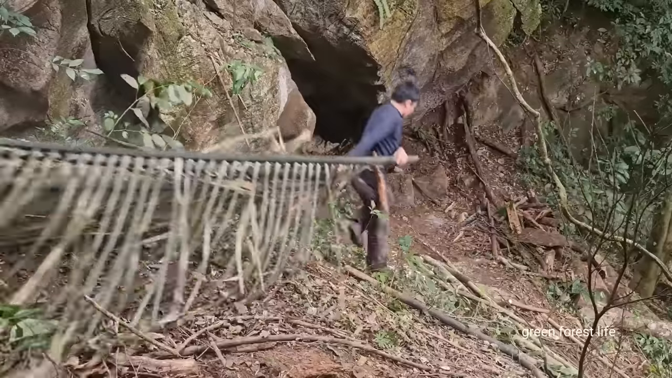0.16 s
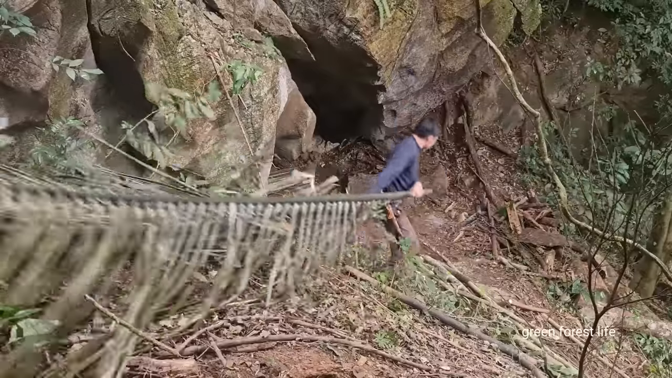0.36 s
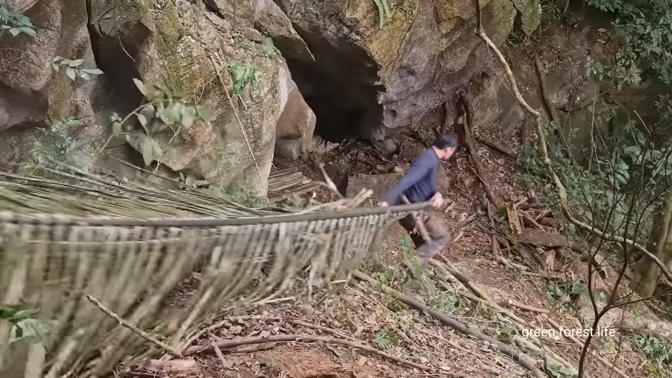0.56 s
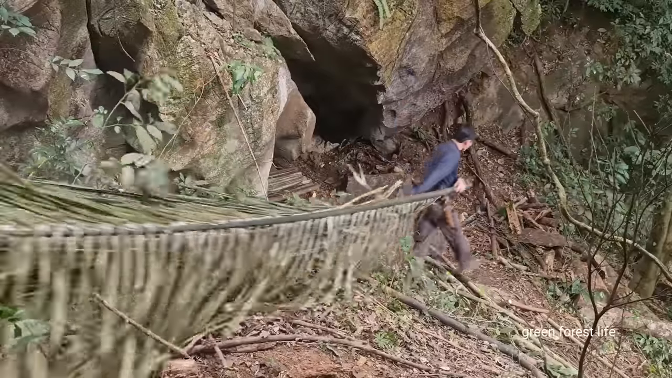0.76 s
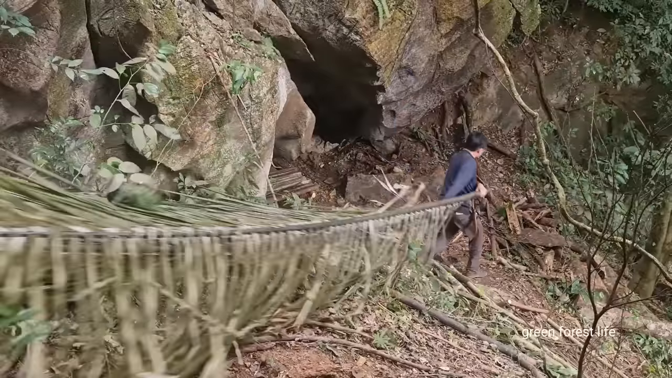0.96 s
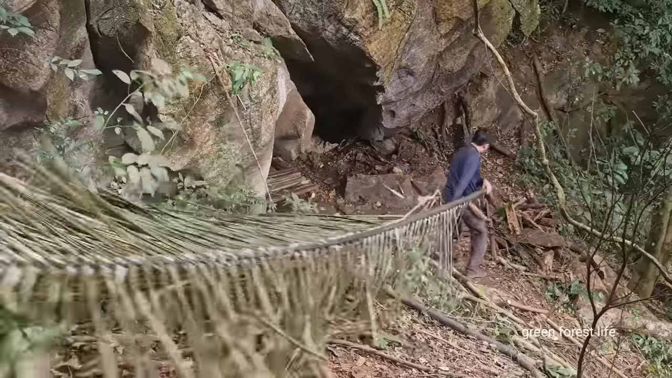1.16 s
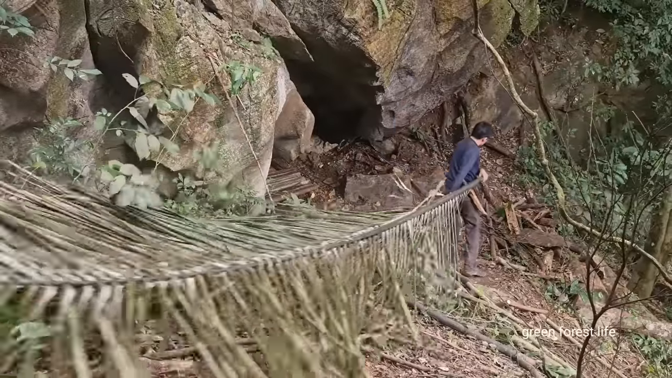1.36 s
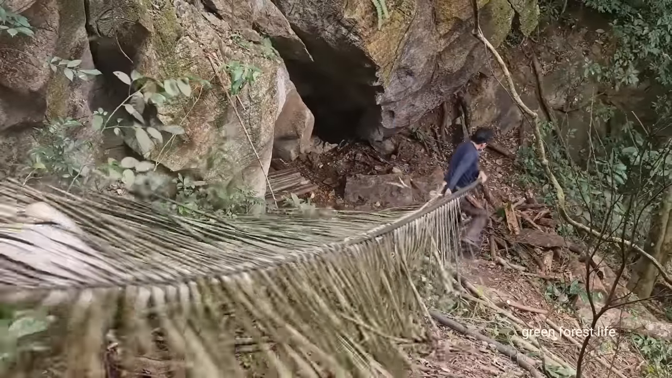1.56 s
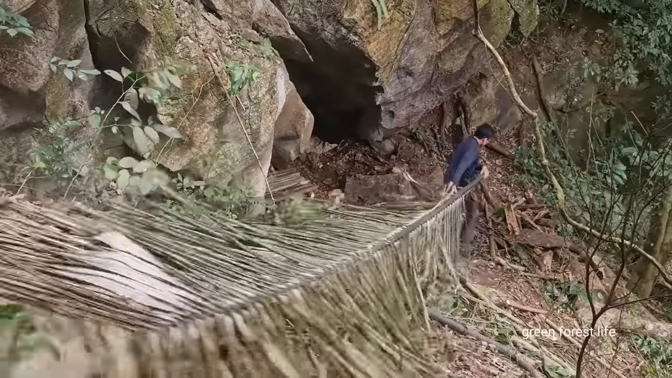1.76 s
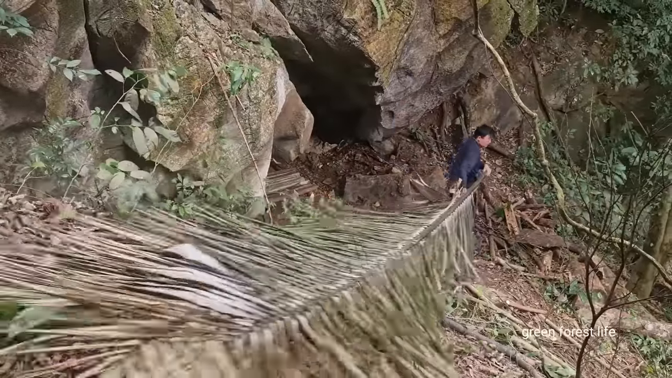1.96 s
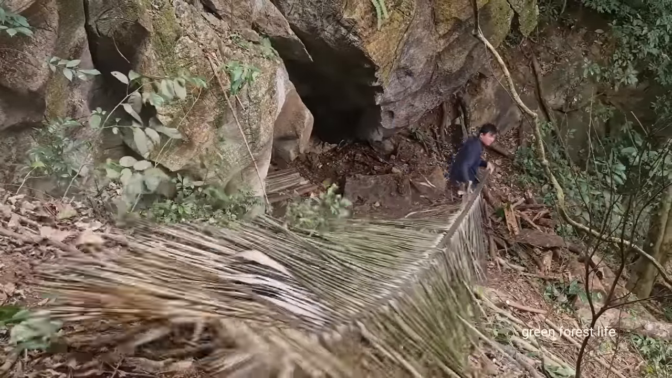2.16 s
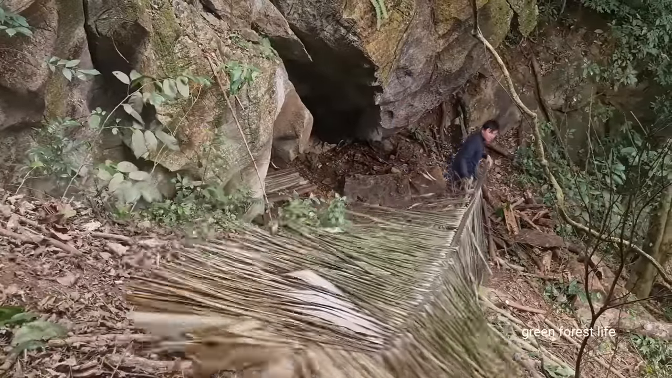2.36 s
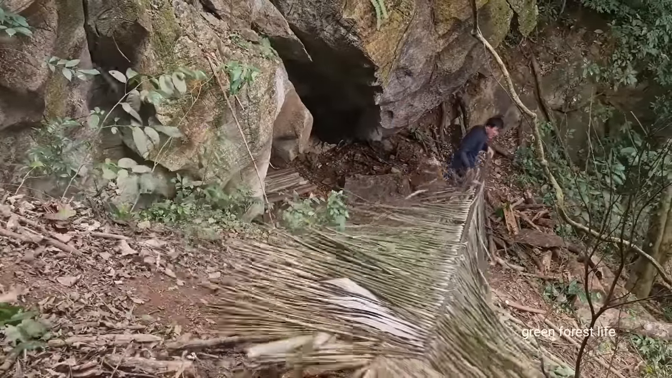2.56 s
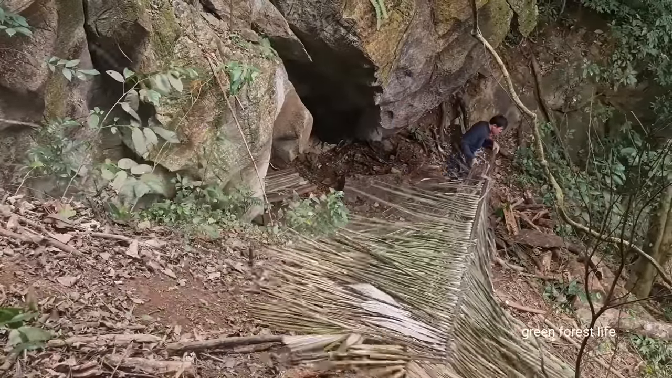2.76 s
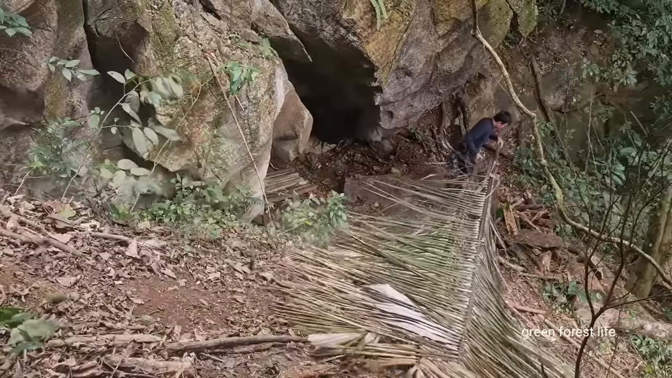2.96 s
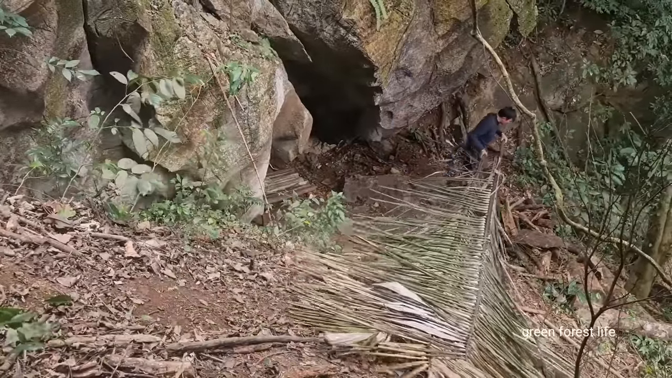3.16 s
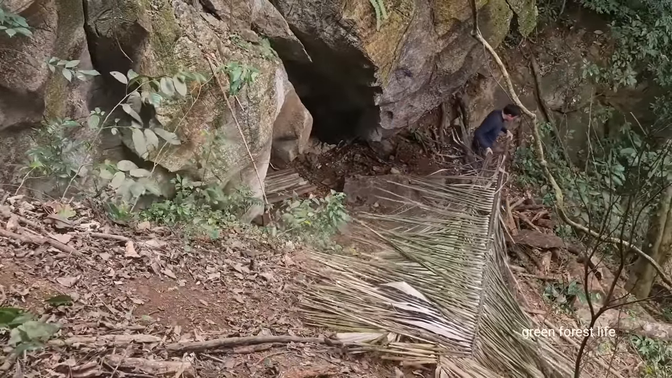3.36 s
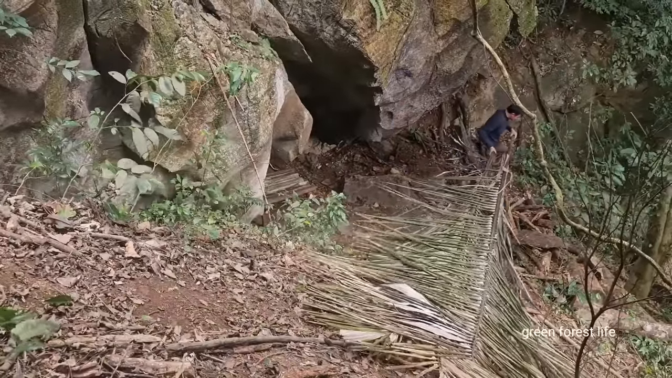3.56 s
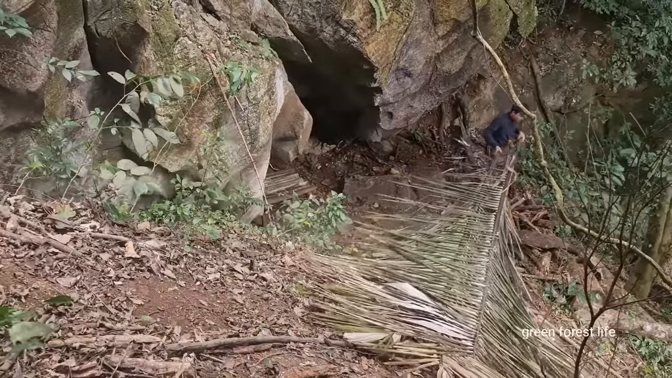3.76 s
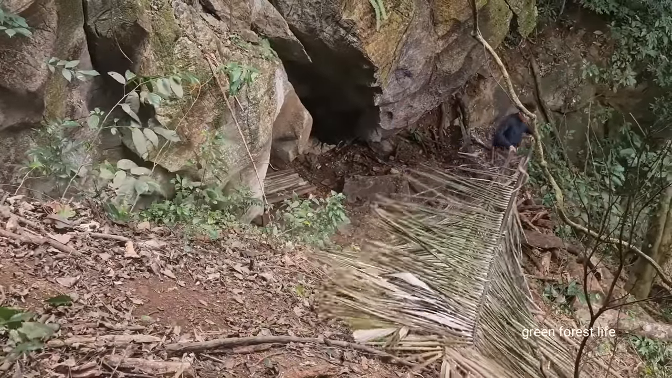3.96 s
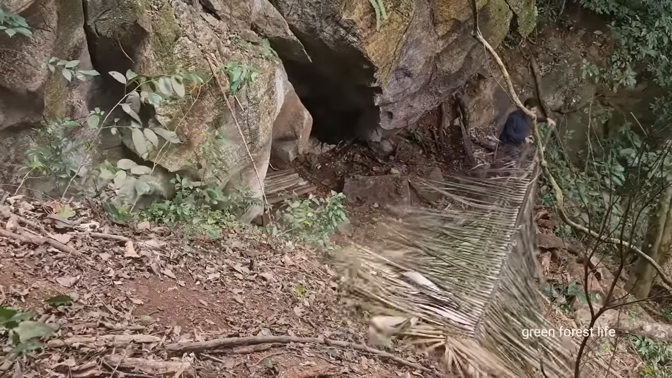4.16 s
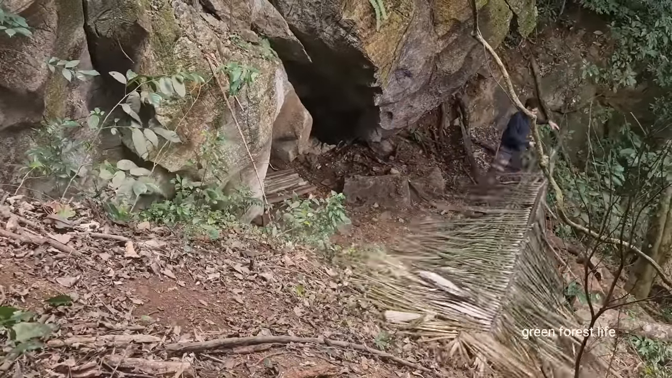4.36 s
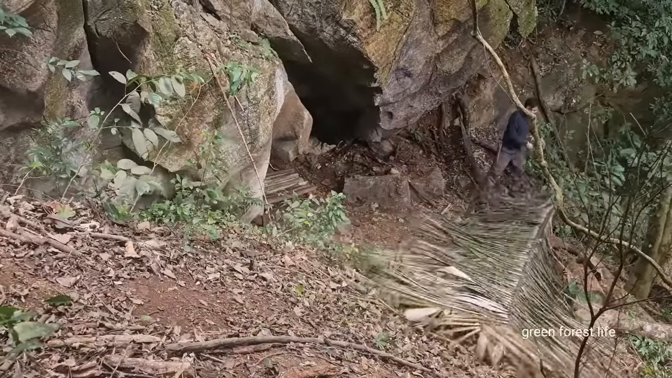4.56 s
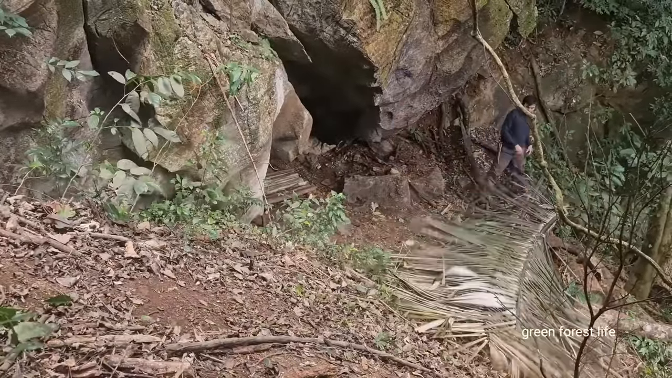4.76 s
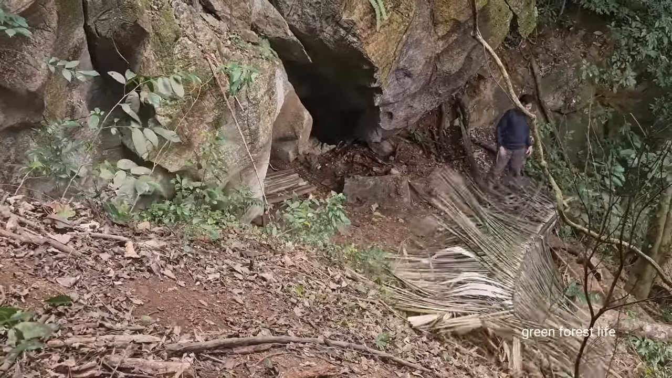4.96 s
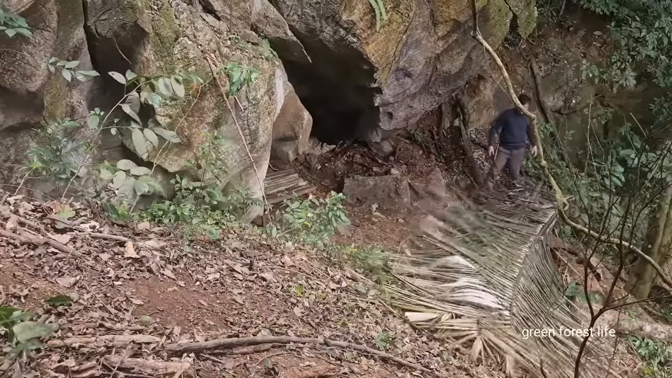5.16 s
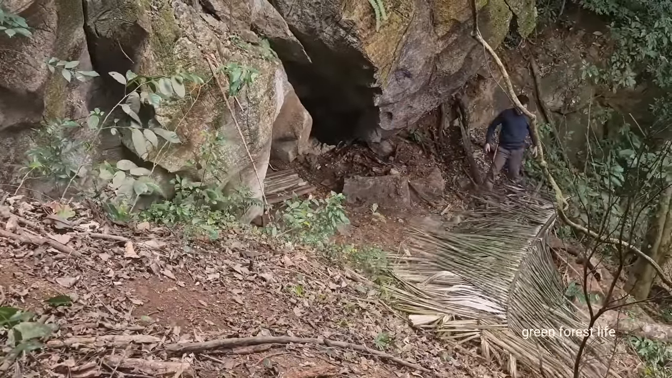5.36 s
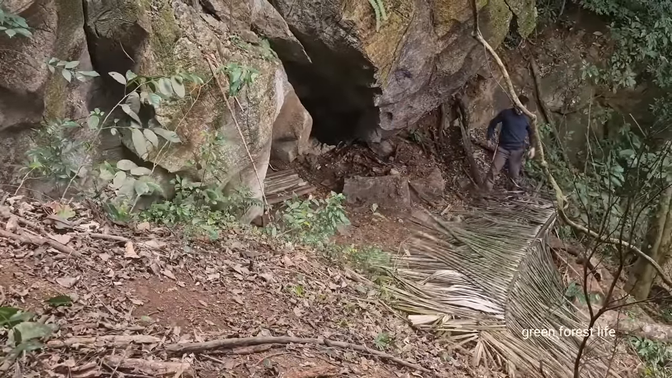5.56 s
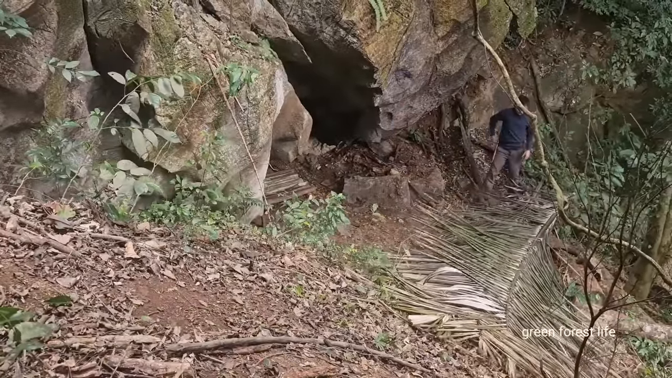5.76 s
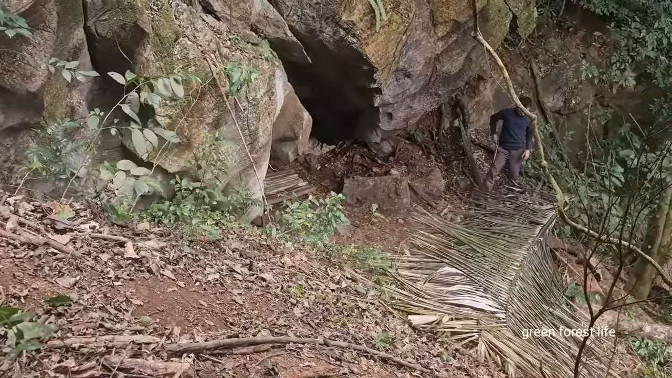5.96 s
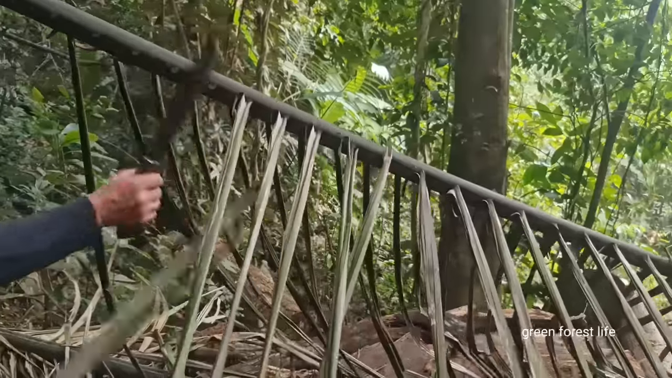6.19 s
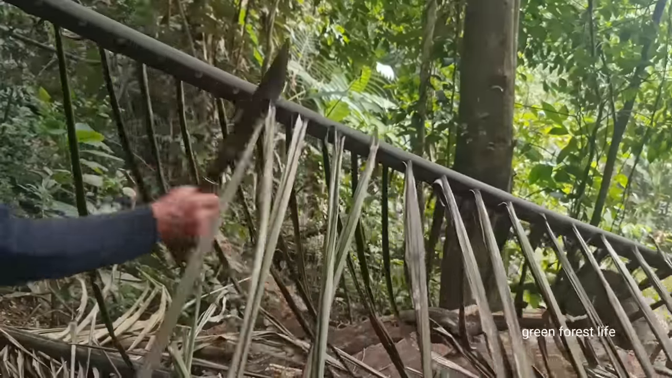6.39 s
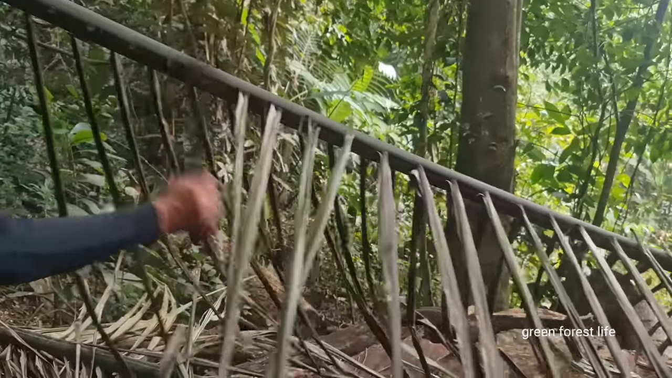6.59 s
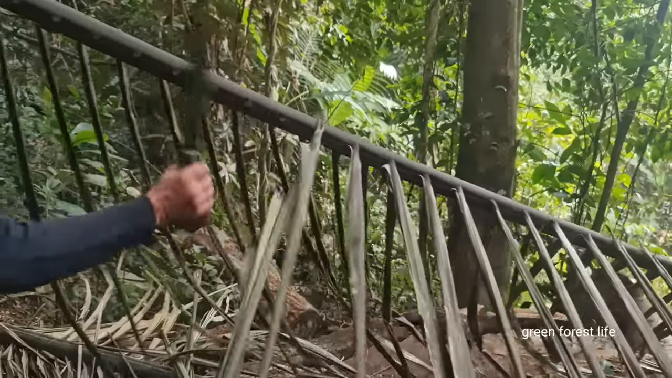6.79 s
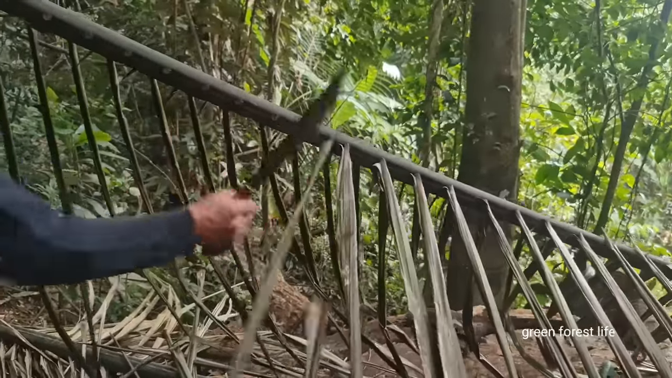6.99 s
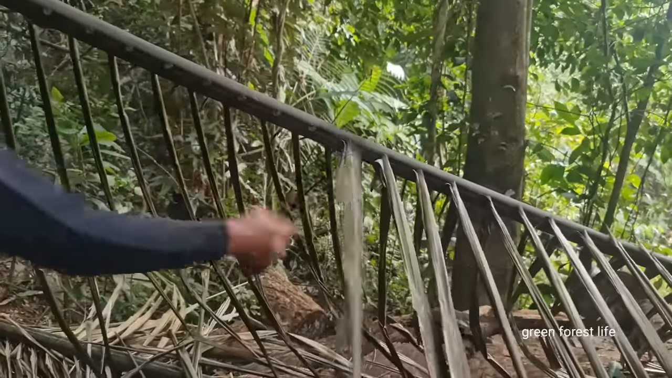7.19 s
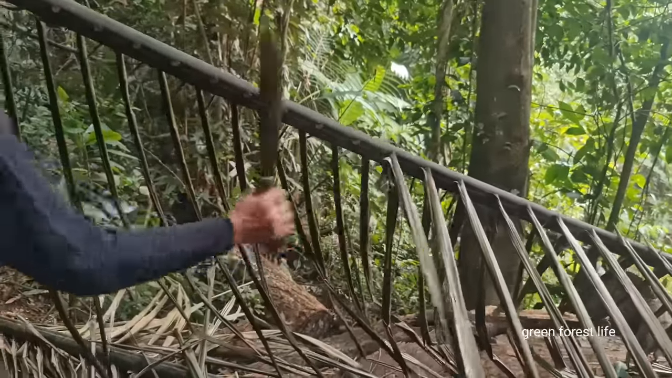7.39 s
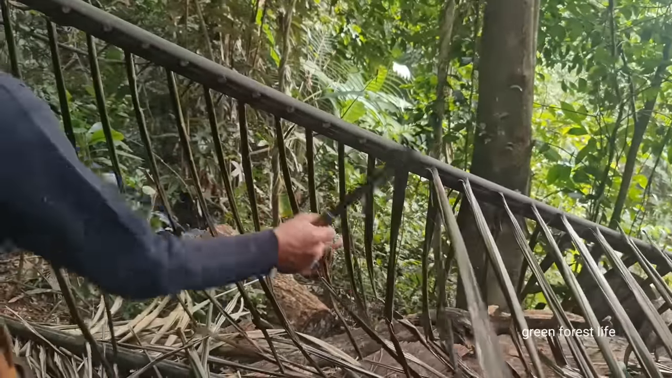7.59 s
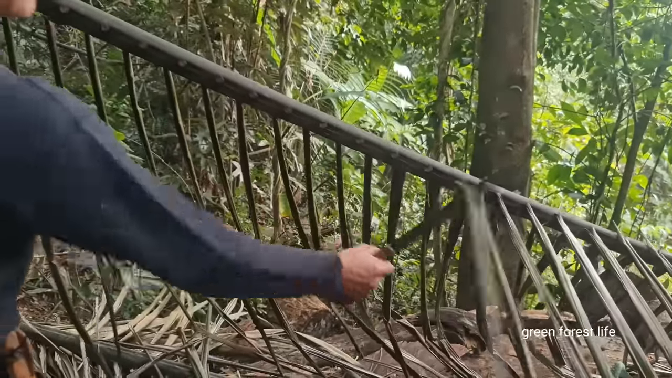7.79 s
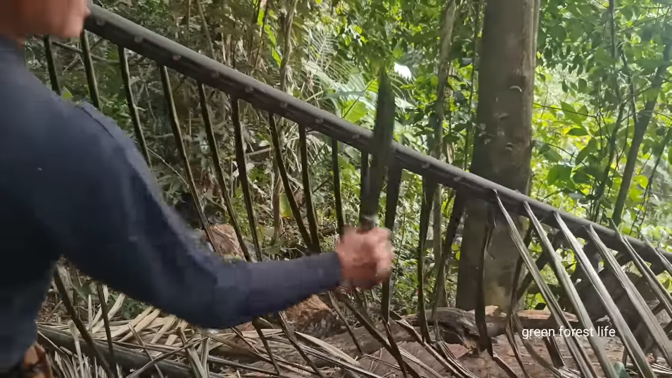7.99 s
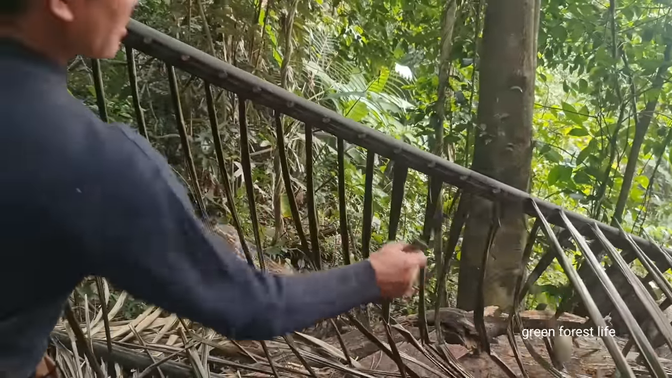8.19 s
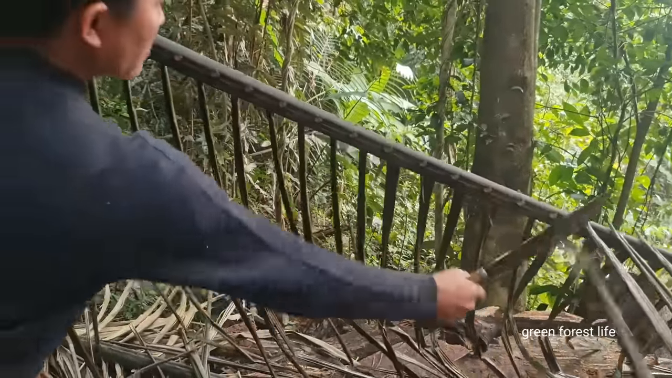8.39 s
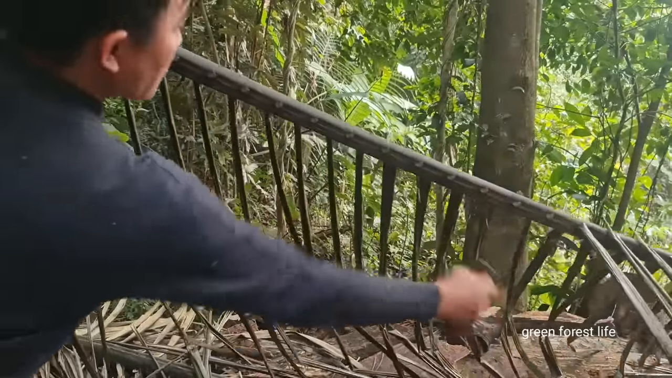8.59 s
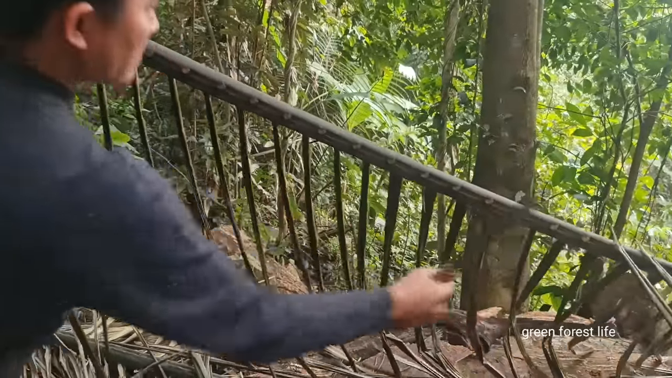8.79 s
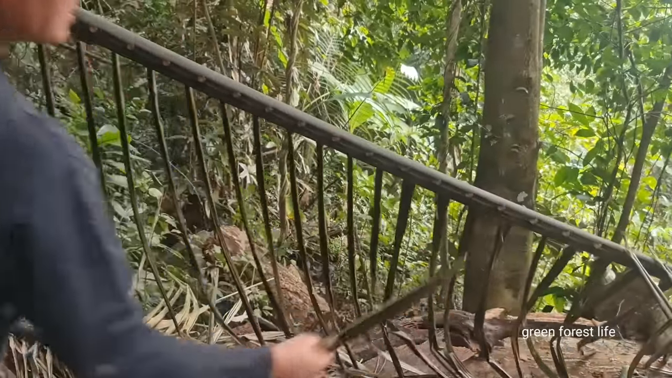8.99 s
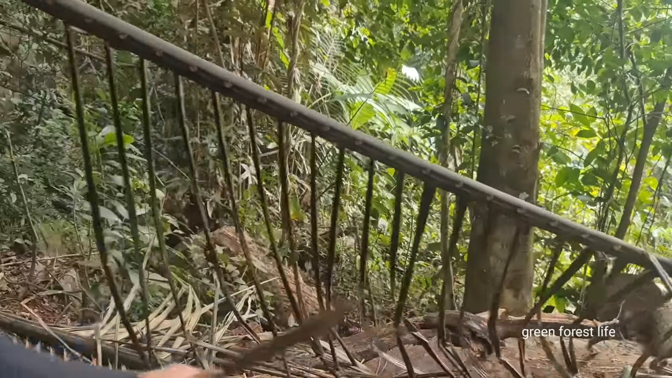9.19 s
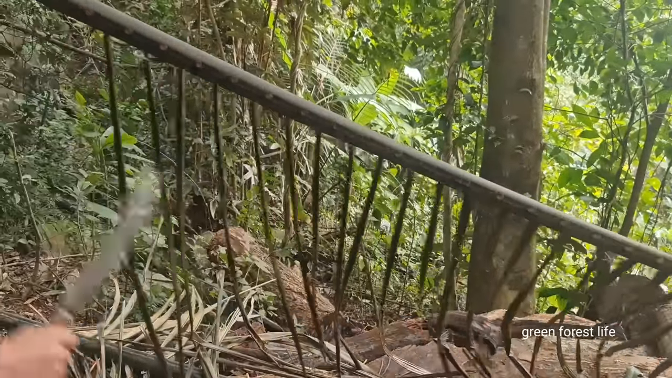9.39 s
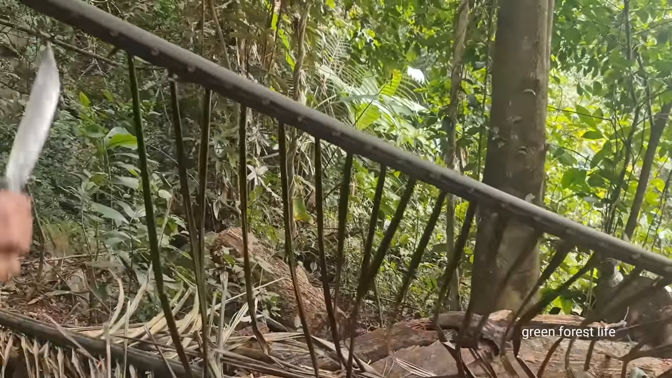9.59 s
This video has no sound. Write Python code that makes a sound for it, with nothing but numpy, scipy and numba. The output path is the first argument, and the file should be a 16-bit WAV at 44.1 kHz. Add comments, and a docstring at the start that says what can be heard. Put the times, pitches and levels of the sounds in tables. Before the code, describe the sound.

A big dry palm frond drags loudly across leaf litter and settles, then a machete chops strips off its rib in quick, sharp, crunchy blows.

```python
"""A long leafy frond is dragged away over dry litter, tugged once more and dropped: a dense wash of tiny dry ticks.
Close by, a machete then chops leaf strips off its rib at a quick beat: each blow is a burst of ticks, a rush of
snapping fibre and often a knock of the woody rib, heard as damped sines, while cut strips swish down between.
Low thuds mark weight on the ground, the snaps and knocks leave a short noise tail, and faint low air lies under all.
Each tick has its own bearing, heard as lag between a phone's two spaced ports; the pan follows the rustle."""
import sys
import numpy as np
from scipy import signal
from scipy.fft import rfft, irfft, next_fast_len
from scipy.io import wavfile
from scipy.ndimage import map_coordinates
from numba import njit

SR = 44100
rng = np.random.default_rng(int(sys.argv[2]) if len(sys.argv) > 2 else 0)


def decibels_to_gain(level_db):
    """Convert a level in decibels to a linear amplitude gain (20 dB per decade)."""
    exponent = np.asarray(level_db, float) / 20
    return 10 ** exponent


def int16_out(signal):
    """Quantize to a 16-bit WAV file."""
    q = np.round(np.clip(np.atleast_2d(signal).T, -1, 1) * 32767)
    wavfile.write(sys.argv[1], SR, q.astype(np.int16))


N = 425124
TICKS_PER_S = 24000


def along(table, s):
    """The columns of a (t/s, ..) table read at times s."""
    table = np.asarray(table, float)
    return [np.interp(s, table[:, 0], column) for column in table.T[1:]]


@njit
def rings(left, right, pole, z_left, z_right, steps, size):
    """Each grain is a damped sine that starts at its own sample in either port."""
    out = np.zeros((2, size + 32768))
    for k in range(len(pole)):
        z = 1. + 0j
        for i in range(steps[k]):
            out[0, left[k] + i] += (z * z_left[k]).imag
            out[1, right[k] + i] += (z * z_right[k]).imag
            z *= pole[k]
    return out[:, 64:size + 64]  # the starts carry 64 samples of headroom for the lag


# Where the rustle comes from: t/s, bearing/degrees to the right
RUSTLE_BEARING = [(.23, 11), (.25, -75), (.75, -64.5), (1.75, -33.5), (2.25, 9), (2.75, 16), (4.5, 25),
                  (6.05, 11), (6.2, -14), (7.25, 1.5), (7.75, 13), (8.75, 24.5), (9.2, 60.5)]


def grains(s, hz, t60, gain, aim, turn):
    """Damped sines at times s; aim scatters their bearing, which sets the lag between the ports."""
    port_gap_s, spread_deg = .00052, 21  # longest lag; spread of bearing per unit of aim
    ahead_db, right_db = -1.08, -2.5  # left minus right: straight ahead, and added at 90 degrees right
    s, hz, t60, gain, aim, turn = (a.ravel() for a in np.broadcast_arrays(s, hz, t60, gain, aim, turn))
    centre = along(RUSTLE_BEARING, s)[0]
    pan_db = ahead_db + right_db * np.sin(np.radians(centre))
    lag = port_gap_s * SR * np.sin(np.radians(centre + spread_deg * aim))
    left = np.clip(64 + s * SR + lag / 2, 0, N).astype(np.int64)
    right = np.clip(left - np.round(lag), 0, N).astype(np.int64)
    pole = np.exp(2j * np.pi * hz / SR - np.log(1000) / (t60 * SR))
    z = gain * np.exp(1j * turn)
    steps = np.clip(t60 * SR * 5 / 6, 2, 32000).astype(np.int64)  # normally stops 50 dB down
    return rings(left, right, pole, z * decibels_to_gain(pan_db / 2), z * decibels_to_gain(-pan_db / 2), steps, N)


def patches(s, hz):
    """Slow chance over time and pitch, spread near 1: each bunch of leaves flurries on its own."""
    per_s, per_octave = 35., 1.226
    knots = rng.standard_normal((int(N / SR * 80), 32))
    return 1.78 * map_coordinates(knots, [s * per_s, np.log2(hz / 20) * per_octave], order=1)


def tick_times(start, end):
    """Chance times, evenly dense from start to end in seconds."""
    return np.sort(start + (end - start) * rng.random(int(TICKS_PER_S * (end - start))))


def ticks(s, level_db, treble_db, bass_db, deep_db, scatter_db, patchy_db):
    """Dry ticks of a few cycles at times s; most are small, a few are large, and they come in flurries."""
    turns, largest_db, trim_db = 4.0, 13, 2.5  # ring in cycles per t60; ceiling of the scatter; common lift
    u, turn, ring = rng.random((3, len(s)))
    hz = 40 + 16500 * u ** 2
    deep = 1 / (1 + (hz / 69.0) ** 2)  # only heavy parts on the ground rumble
    low = 1 / (1 + (hz / 730.0) ** 2)  # thick stems scrape low
    high = 1 / (1 + (4800.0 / hz) ** 4)  # leaf tips hiss high
    db = level_db + trim_db + low * bass_db + high * treble_db + deep * deep_db
    db = db + np.minimum(scatter_db * rng.exponential(size=len(s)), largest_db)
    db = db + patchy_db * patches(s, hz)
    # high ticks are short and many: this slope leaves the sum white
    gain = decibels_to_gain(db) * (hz / 3000) ** .75
    # some of the brighter ticks come by way of trunks and rock, so they scatter wider
    strays = rng.random(len(s)) < .3
    aim = rng.standard_normal(len(s)) * (1 + 2.5 * (1 - low) * strays)
    return grains(s, hz, turns * (.5 + ring) / hz, gain, aim, np.pi * turn)


# The frond in the litter: a far rustle fades, a long pull, a second tug, the leaves settle.
# t/s, level/dB (of a tick, before trim, tone and scatter)
DRAG_LEVEL = [(0, -42), (.235, -54), (.26, -30), (.32, -25), (.51, -21.5), (1.06, -26), (2.16, -29),
              (2.7, -32), (2.84, -35), (3.54, -43), (3.68, -48), (3.81, -43), (3.9, -36.5), (4.26, -31),
              (4.54, -33), (4.64, -28), (4.99, -44.5), (5.19, -46), (5.29, -45), (5.48, -60.5),
              (6.05, -72.5)]
# Bass of the drag against its level: t/s, level/dB
DRAG_BASS_LEVEL = [(.22, -4), (.26, -0.5), (1.2, 1.7), (2.3, -2.5), (3.5, 0), (4.3, -7), (5.1, -10),
                   (5.5, 5)]


def frond_drag():
    """The dragged frond: so many leaves tick on the litter that they blur into a dense wash."""
    s = tick_times(0, STRIPS_LEVEL[0][0])
    level_db, bass_db = along(DRAG_LEVEL, s)[0], along(DRAG_BASS_LEVEL, s)[0]
    return ticks(s, level_db, -4.5, bass_db, 0.098, scatter_db=3.5, patchy_db=1.03)


# Each blow crushes a handful of leaf and stem:
# t/s, level/dB (of a tick, before trim, tone and scatter), held/s, t60/s
CRUSHES = [(6.381, -31.5, 0.029, 0.097), (6.666, -30, 0.04, 0.077), (6.986, -29, .0063, 0.1),
           (7.252, -27, 0.01, 0.19), (7.537, -28, .024, 0.059), (7.819, -29, .024, 0.17),
           (8.108, -32, 0.035, 0.12), (8.394, -28.5, 0.016, 0.29), (8.667, -23, 0.01, 0.078),
           (8.944, -50.5, 0.005, 0.071)]


def crunch():
    """A blow starts a dense burst of ticks that holds while the blade goes through, then fades."""
    bits = 4000
    s, db, held, t60 = np.transpose(CRUSHES)[:, :, None]
    late = rng.random((len(CRUSHES), bits)) * bits / TICKS_PER_S
    level_db = db - 60 * np.maximum(late - held, 0) / t60
    treble_db, bass_db, deep_db = 0.8, 6.5, -10  # against the level
    return ticks((s + late).ravel(), level_db.ravel(), treble_db, bass_db, deep_db, scatter_db=4.0, patchy_db=2.5)


# Blade blows, strips tearing, twigs snapping:
# t/s, level/dB (before each layer's trim), f/Hz (central pitch), spread/octaves
FIBRE_SNAPS = [(1.331, -5.5, 2980, 0.42), (1.681, 0.5, 6840, 0.24), (1.783, 1, 2690, 0.64),
               (2.685, -10, 1800, 0.11), (3.052, -19, 2170, 0.32), (3.124, -20, 2180, 0.22),
               (3.502, -12, 7050, 0.44), (5.044, -20, 5910, 0.25), (5.278, -24, 3100, 0.32),
               (5.446, -40, 1750, 0.3), (5.47, -39, 1680, 0.23), (5.974, -43.5, 1750, 0.2),
               (6.077, -25, 6430, 0.25), (6.105, -35, 9500, 0.46), (6.337, -13, 7260, 0.18),
               (6.365, -6, 6760, 0.29), (6.383, 3, 5500, 0.76), (6.391, -11.5, 2200, 0.43),
               (6.405, 4, 6000, 0.52), (6.571, -9, 1840, 0.66), (6.667, -14.5, 1760, 0.16),
               (6.681, -0.5, 7130, 0.24), (6.697, -9, 1720, 0.31), (6.913, -14, 6700, 0.34),
               (6.987, -0.5, 3840, 0.4), (7.253, -3, 3470, 0.38), (7.269, -6.5, 2200, 0.65),
               (7.308, -13, 3180, 0.29), (7.367, -12, 3080, 0.32), (7.42, -0.5, 7170, 0.48),
               (7.538, 0, 3900, 0.26), (7.552, -4, 4560, 0.63), (7.62, -16, 1570, 0.5),
               (7.718, -19, 3350, 0.34), (7.787, -15, 8700, 0.41), (7.807, -9, 1810, 0.65),
               (7.821, -6, 1990, 0.26), (7.834, 7.5, 6640, 0.7), (7.855, -12, 6890, 0.32),
               (8.086, -15.5, 1520, 0.75), (8.12, 7, 5500, 0.57), (8.135, 0.5, 4230, 0.57),
               (8.396, 4.5, 6450, 0.57), (8.408, -9, 1950, 0.27), (8.671, 3, 3730, 0.56),
               (8.69, 6, 5230, 0.65), (8.774, -20, 2630, 0.21), (8.943, -13.5, 4000, 0.27),
               (8.975, -21.5, 1400, 0.14), (9.108, -20, 5840, 0.62), (9.126, -20, 8000, 0.26),
               (9.532, -12, 6000, 0.6)]


def snaps(rows):
    """Fibres part in a rush that dies away: bits around a central pitch; a narrow snap rings longer."""
    bits, bit_db, uneven_db = 80, -11, 1.5
    rush, t60 = 2.8, .036  # crowding of bits towards the start; fade of the rush in s
    turns = 2.38  # cycles per t60 of a bit one octave wide
    s, db, hz, octaves = np.transpose(rows)[:, :, None]
    chance = rng.random((len(rows), 2, bits))
    normal = rng.standard_normal((len(rows), 3, bits))
    late = t60 * chance[:, 0] ** rush / 2
    pitch = np.clip(hz * 2 ** (octaves * normal[:, 0]), 150, 16000)
    bit_level_db = db + bit_db - 60 * late / t60 + uneven_db * normal[:, 2]
    gain = decibels_to_gain(bit_level_db) * (pitch / hz) ** .5
    flip = np.pi * np.round(chance[:, 1])  # either polarity
    return grains(s + late, pitch, turns / octaves / pitch, gain, 0.36 * normal[:, 1], flip)


def cracks():
    """The first fibre to break gives a short bright click, the louder the brighter the snap."""
    bits, within_s, turns = 6, .0008, 3.0
    trim_db, tilt_db = -6, 4.0  # tilt per octave of the snap's pitch, from 6 kHz
    s, db, hz, _ = np.transpose(FIBRE_SNAPS)[:, :, None]
    late, u = rng.random((2, len(FIBRE_SNAPS), bits))
    pitch = 4000 + 11000 * u
    gain = decibels_to_gain(db + trim_db + tilt_db * np.log2(hz / 6000))
    return grains(s + within_s * late, pitch, turns / pitch, gain, 0, 0)


# The woody rib knocked, ringing higher or lower with the free length:
# t/s, level/dB (before mode levels and scatter), f/Hz (strongest mode, before detuning)
RIB_KNOCKS = [(6.214, -41, 860), (6.391, -28, 842), (6.699, -41, 775), (6.985, -42, 750), (7.252, -34, 720),
              (7.538, -20.5, 840), (7.819, -26.5, 960), (7.858, -31, 770), (8.108, -21, 908),
              (8.269, -33, 555), (8.397, -20, 580), (8.481, -31.5, 823), (8.678, -15, 765),
              (8.945, -35, 790)]
# Modes of the rib: multiple of the strongest mode's f, level/dB, t60/s
RIB_MODES = [(.45, -4, 0.045), (.8, -9, 0.033), (1, 3.5, 0.059), (1.9, -18.5, 0.035), (2.4, -10, .025)]


def rib():
    """The rib's modes are set off unevenly by where the knock lands."""
    scatter_db, detune = 3.5, 0.037  # detune as a fraction of f
    s, db, hz = np.transpose(RIB_KNOCKS)[:, :, None]
    multiple, mode_db, t60 = np.transpose(RIB_MODES)
    normal = rng.standard_normal((len(RIB_KNOCKS), 2, len(RIB_MODES)))
    gain = decibels_to_gain(db + mode_db + scatter_db * normal[:, 0])
    mode_hz = hz * multiple * (1 + detune * normal[:, 1])
    return grains(s, mode_hz, t60, gain, 0, 0)


# Cut strips swishing and falling between the blows:
# t/s, level/dB (of a tick, before trim, tone and scatter)
STRIPS_LEVEL = [(6.065, -75), (6.08, -51), (6.19, -74), (6.208, -48.5), (6.32, -49), (6.46, -37.5),
                (6.56, -43), (6.65, -37.5), (6.9, -40), (7.05, -41), (7.11, -42), (7.16, -57.5),
                (7.21, -42.5), (7.41, -37), (7.51, -39.5), (7.63, -38), (7.7, -50.5), (7.85, -46.5),
                (8.07, -47.5), (8.094, -35.5), (8.22, -47.5), (8.53, -48), (8.7, -39), (8.89, -54),
                (8.92, -46.5), (9.03, -51), (9.22, -51.5), (9.32, -46), (9.5, -41.5), (9.64, -43.5)]
# Treble of the falling strips against their level: t/s, level/dB
STRIPS_TREBLE_LEVEL = [(6.2, -9), (6.38, 5), (6.65, -9), (7, 2.5), (7.25, -8.5), (8.05, -4.5), (8.5, -2),
                       (9.15, -4.2), (9.45, -6)]


def falling_strips():
    """Cut strips swish down: leaf ticks again, patchier and with less deep rumble than the drag."""
    s = tick_times(STRIPS_LEVEL[0][0], N / SR)
    level_db, treble_db = along(STRIPS_LEVEL, s)[0], along(STRIPS_TREBLE_LEVEL, s)[0]
    return ticks(s, level_db, treble_db, 1.5, -6.0, scatter_db=3.5, patchy_db=2.5)


def small_snaps():
    """Chance rows for snaps(): splinters as cut strips fall after a blow, twigs under the dragged frond."""
    splinters_per_blow, splinter_db, within_s = 5, 17, 0.24
    twigs, twig_db = 24, 16
    low_hz, range_octaves, spread_octaves = 1500, 2.1, 0.78
    wait = .04 + within_s * rng.random((len(CRUSHES), splinters_per_blow))
    after = (np.array(CRUSHES)[:, :1] + wait).ravel()
    after = after[after < N / SR]
    under = rng.random(twigs) * DRAG_LEVEL[-1][0]
    s = np.concatenate([after, under])
    db = np.concatenate([along(STRIPS_LEVEL, after)[0] + splinter_db, along(DRAG_LEVEL, under)[0] + twig_db])
    size, colour = rng.random((len(s), 2)).T
    hz = low_hz * 2 ** (range_octaves * colour)
    return np.transpose([s, db + 4.4 * (size - .5), hz, spread_octaves + 0 * s])


# Footfalls and the rib bumping the ground: t/s, level/dB (before pan), f/Hz
GROUND_THUDS = [(.329, -23, 62), (1.019, -14, 67), (1.328, -21, 145), (3.054, -22, 211), (4.617, -20, 227),
                (5.538, -46, 207), (5.629, -39, 119), (5.779, -44, 197), (6.688, -22, 250),
                (7.253, -31, 175), (7.841, -33, 177)]


def thuds():
    """Soft ground answers a weight with a few low cycles."""
    s, db, hz = np.transpose(GROUND_THUDS)
    return grains(s, hz, 7.8 / hz, decibels_to_gain(db), 0, 0)


def forest(near):
    """Trunks and rock scatter the sound back as a short tail, different at each port."""
    t60, wet_db, dull_hz = 0.14, -14, 6000.
    t = np.arange(SR // 2) / SR
    tail = rng.standard_normal((2, len(t))) * decibels_to_gain(-60 * t / t60) * np.clip(t / 0.0007, 0, 1)
    tail = signal.lfilter(*signal.butter(1, dull_hz, fs=SR), tail)
    tail = tail / np.sqrt(np.sum(tail ** 2, axis=1, keepdims=True))
    return decibels_to_gain(wet_db) * signal.fftconvolve(near, tail, axes=1)[:, :N]


def air():
    """Faint air: noise rolled off gently above 60 Hz, separate at each port."""
    noise = rng.standard_normal((2, N))
    return decibels_to_gain(-39) * signal.lfilter(*signal.butter(1, 60., fs=SR), noise)


def scene():
    """Leaves, blows and thuds over faint air; the snaps, cracks and rib knocks echo."""
    blows = snaps(FIBRE_SNAPS) + snaps(small_snaps()) + cracks() + rib()
    leaves = frond_drag() + falling_strips()
    return leaves + crunch() + blows + thuds() + forest(blows) + air()


def on_log_hz(table, hz):
    """The columns of a (f/Hz, ..) table on a log-frequency axis."""
    table = np.asarray(table, float)
    return [np.interp(np.log(hz + 1), np.log(table[:, 0]), column) for column in table.T[1:]]


# Tone of the phone, common to both ports: f/Hz, level/dB
PHONE_TONE = [(25, -41), (64, -15.5), (300, -13), (750, 1), (1400, -4), (3600, -0.5), (4800, -2), (6800, 0),
              (8000, -7), (12600, -6), (14800, -8.5), (16500, -40)]
# Stereo width by pitch, added to the tone: f/Hz, side level/dB, mid level/dB
STEREO_WIDTH = [(50, 5, -4.5), (148, -4, -1.5), (294, 6.5, 1), (644, -1, -5), (1046, -2.5, -4.5),
                (1342, 5, 3.5), (2140, 1, 0.5)]


def phone(dry):
    """The phone colours the sound and reweighs the ports' difference (side) and sum (mid) by pitch."""
    size = next_fast_len(N + 4096)
    hz = np.arange(size // 2 + 1) * SR / size
    # fold the cepstrum to make the tone causal, so that its ringing follows a blow
    cepstrum = irfft(np.log(decibels_to_gain(on_log_hz(PHONE_TONE, hz)[0])), size)
    cepstrum[1:size // 2] *= 2
    cepstrum[size // 2 + 1:] = 0
    colour = np.exp(rfft(cepstrum))
    side_db, mid_db = on_log_hz(STEREO_WIDTH, hz)
    mid = irfft(rfft(dry[0] + dry[1], size) * colour * decibels_to_gain(mid_db), size)[:N] / 2
    side = irfft(rfft(dry[0] - dry[1], size) * colour * decibels_to_gain(side_db), size)[:N] / 2
    return np.array([mid + side, mid - side])


def roll_off(x):
    """The treble ends steeply here."""
    return signal.sosfilt(signal.butter(12, 16820, fs=SR, output="sos"), x)


def record(dry):
    """The phone's tone and width, with the loudest peaks rounded off."""
    mix = np.tanh(phone(dry))
    return roll_off(mix)


dry = scene()
out = record(dry)
int16_out(out)
```